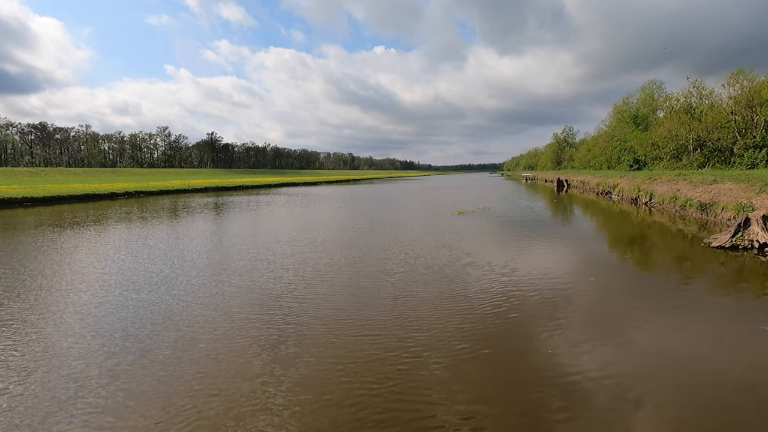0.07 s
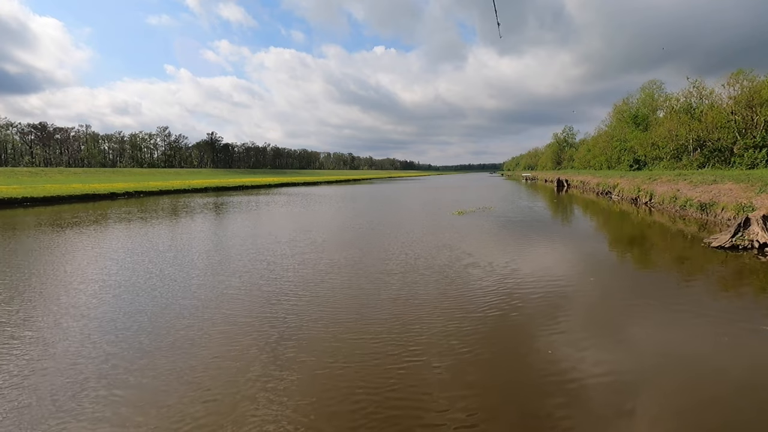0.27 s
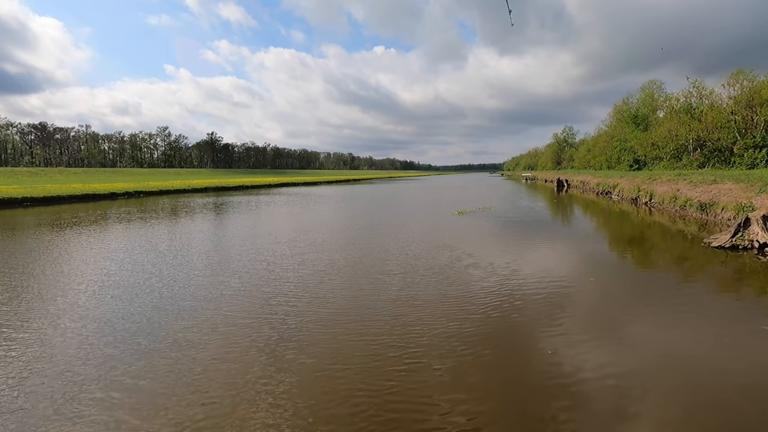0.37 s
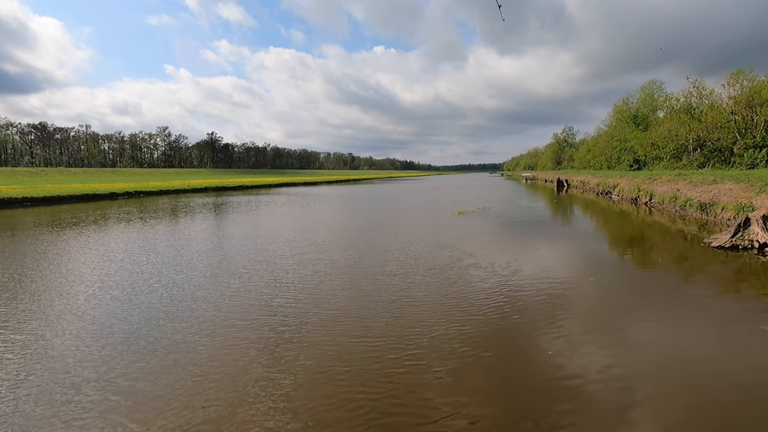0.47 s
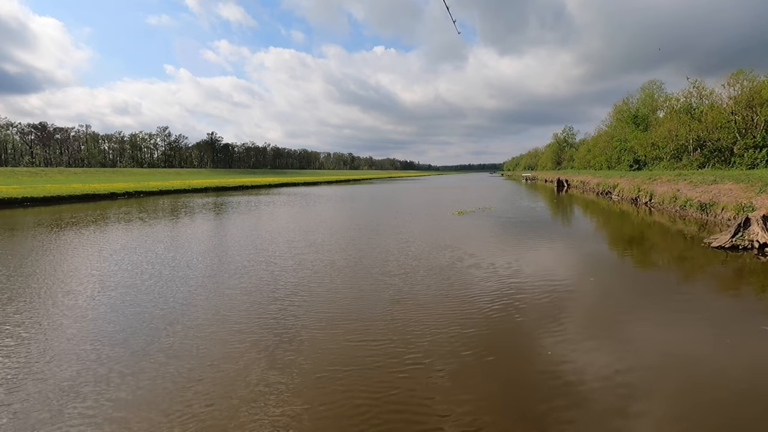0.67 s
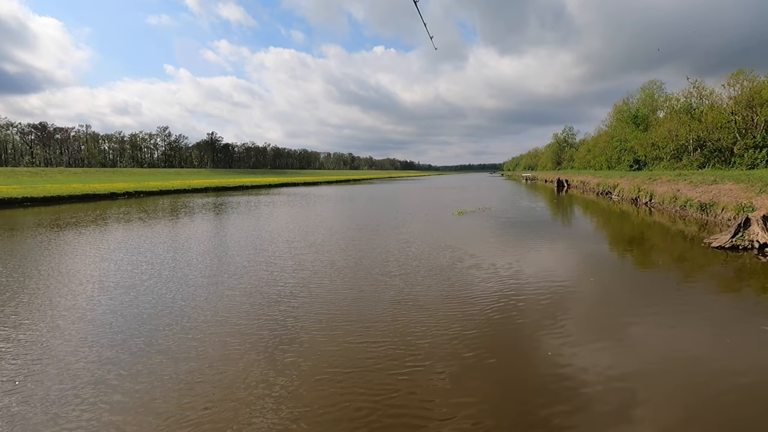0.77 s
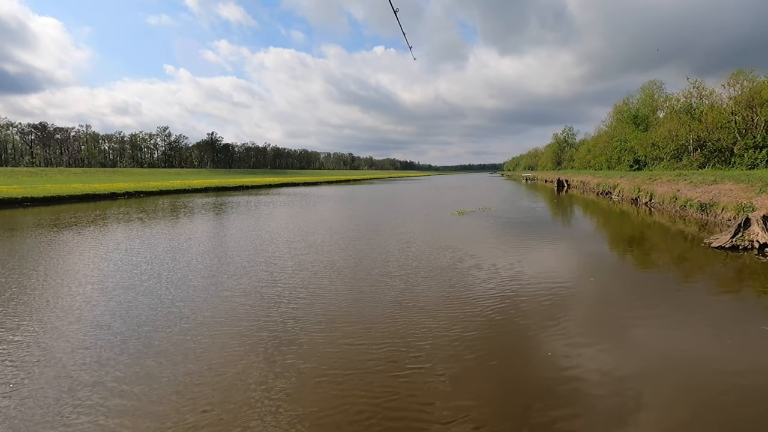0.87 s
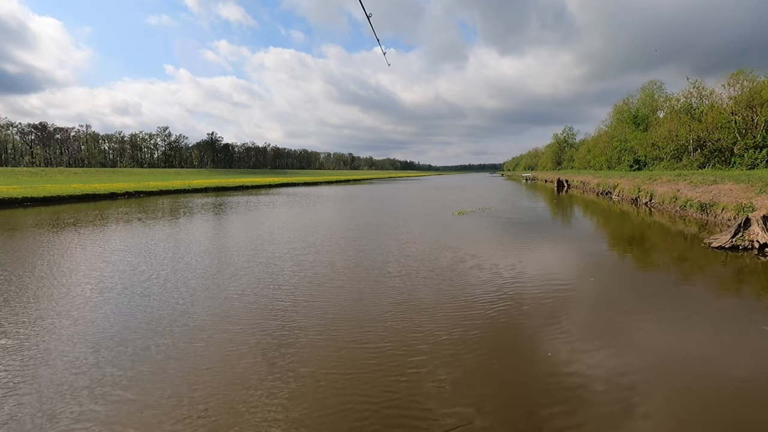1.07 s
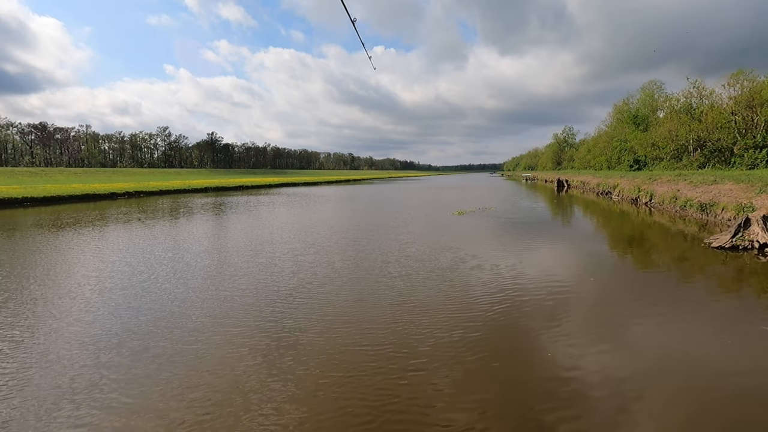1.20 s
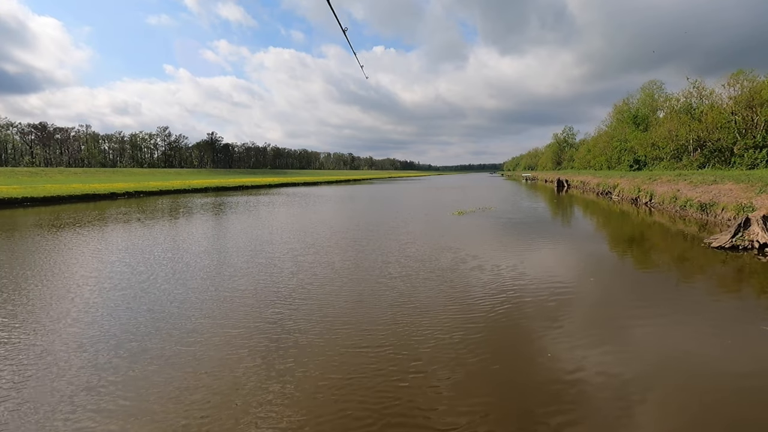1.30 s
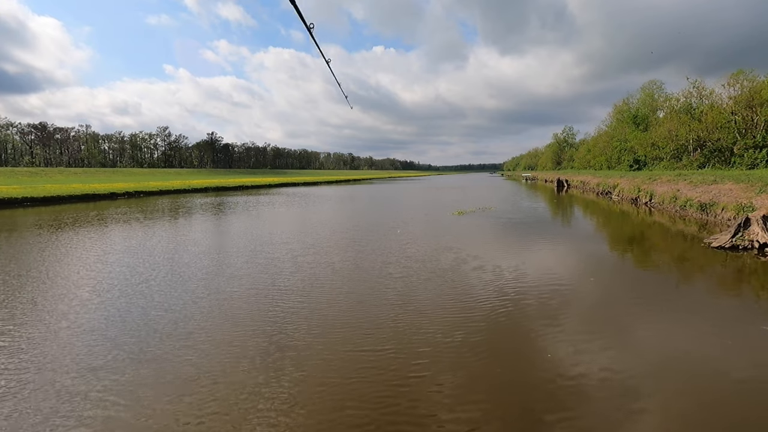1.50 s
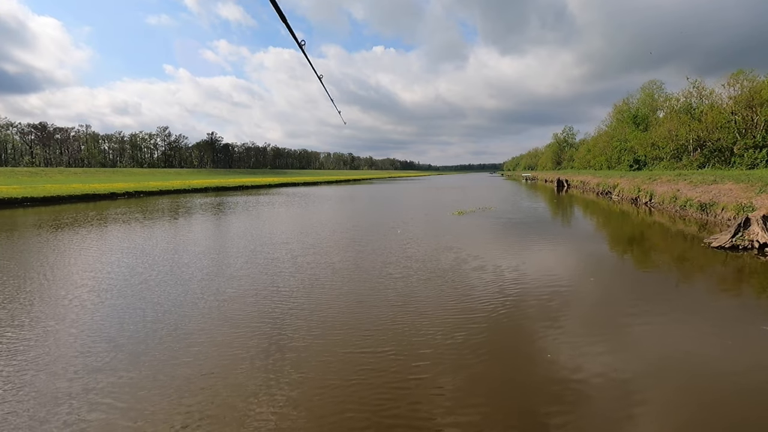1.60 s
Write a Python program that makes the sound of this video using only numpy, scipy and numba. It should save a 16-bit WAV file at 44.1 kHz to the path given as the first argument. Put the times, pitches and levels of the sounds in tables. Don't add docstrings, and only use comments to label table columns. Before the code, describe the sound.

Close stereo outdoor sound of a spinning rod cast: brief whoosh, loud metallic clicks, line whirring out ever slower, soft recoil thump, small water bubbles, faint bird whistles, gentle wind rumble and leaf rustle, almost no echo.

```python
import sys
import numpy as np
from scipy import signal
from scipy.io import wavfile
from scipy.ndimage import uniform_filter1d, map_coordinates
from numba import njit

SR = 44100
rng = np.random.default_rng(int(sys.argv[2]) if len(sys.argv) > 2 else 0)


def convert_level_to_amplitude(level_db):
    exponent = np.asarray(level_db, float) / 20
    return 10 ** exponent


def store_pcm(level_fs):
    pcm = np.round(np.clip(level_fs, -1, 1) * 32767).astype(np.int16)
    wavfile.write(sys.argv[1], SR, np.atleast_2d(pcm).T)


N = 72765

# frequency in Hz, level in dB per Hz.
AIR_TONE = [(100, -0.5), (300, -14.5), (800, -16.5), (1500, -14), (3200, -31), (5000, -23), (7000, -26.5),
            (12500, -41)]
# time in seconds, level in dB.
AIR_LULLS = [(0, 1.5), (.09, -1), (1.0, 0), (1.39, 0), (1.415, -5), (1.455, -5), (1.48, -2), (1.6, -2),
             (1.62, -5)]
# time in seconds, level in dB.
WIND_GUSTS = [(0, -44.5), (.15, -40.5), (.35, -49.5), (.49, -48), (.8, -50), (1.15, -57.5), (1.3, -58.5),
              (1.65, -53)]
# start in seconds, length in seconds, start pitch in Hz, end pitch in Hz,
# level in dB.
BIRD_WHISTLES = [
    (0.945, 0.07, 1850, 2620, -57),
    (1.095, 0.065, 2840, 3110, -57.5),
    (1.157, 0.023, 3320, 3580, -61),
    (1.53, 0.035, 2250, 1880, -57),
    (1.563, 0.05, 1880, 2600, -57),
]
# start in seconds, pitch in Hz, peak level in dB, length in cycles.
BANK_PLOPS = [(.47, 640, -44, 9), (.61, 900, -48, 12), (1.122, 550, -49, 11), (1.145, 530, -49, 14),
              (1.165, 2100, -53, 14), (1.19, 2550, -48, 22), (1.193, 1050, -47, 14), (1.212, 1930, -48, 12),
              (1.226, 690, -46, 11), (1.241, 947, -42, 12), (1.243, 2050, -52, 14), (1.256, 980, -47, 16),
              (1.279, 1530, -44, 16), (1.3, 950, -52, 9), (1.315, 1150, -50, 14), (1.343, 570, -49, 8),
              (1.36, 2050, -51, 14), (1.372, 2100, -52, 16), (1.37, 680, -50, 14), (1.39, 530, -47, 12),
              (1.428, 590, -47, 9), (1.488, 2050, -49, 9), (1.511, 2750, -41, 12), (1.583, 2200, -42, 10),
              (1.509, 1150, -50, 7)]
# time in seconds, shedding pitch in Hz, level in dB.
ROD_SWING = [(.09, 297, -64), (.125, 400, -53), (.145, 505, -40), (.172, 615, -37.5), (.19, 728, -40.5),
             (.21, 900, -38), (.245, 954, -42), (.27, 1015, -47.5), (.33, 1041, -67.5)]
# time in seconds, centre in Hz, level in dB.
SWING_HISS = [(.07, 2800, -60.5), (.11, 3980, -47.5), (.14, 4810, -45), (.18, 4400, -34), (.21, 4970, -46),
              (.25, 5600, -64.5)]
# start in seconds, rise in seconds, hold in seconds, release in seconds,
# level in dB.
BLANK_FLEXES = [
    (.13, 0.025, .025, 0.018, -33.5),
    (.215, .015, .015, .015, -43),
    (0.603, 0.007, 0.004, 0.013, -36),
    (.66, .01, .015, .015, -48),
]
# start in seconds, peak level in dB, brightest pitch in Hz,
# burst in ms, crack level in dB.
RIG_CLICKS = [(.073, -49, 2150, 12.0, -18), (.1745, -23, 3750, 8.0, -20), (.1923, -12, 3300, 7.5, -2),
              (.2098, -16, 4750, 4.0, -15), (.2140, -12.5, 3600, 4.5, -3), (.2205, -18, 4750, 4.0, -9),
              (.2258, -18.5, 4750, 4.0, -9), (.2325, -16, 4000, 1.5, -2), (.2385, -19, 4500, 3.5, -7),
              (.2545, -20, 3700, 5.0, -5), (.4807, -30, 5000, 3.0, -6), (.7849, -39, 6300, 4.0, -6),
              (.9206, -41, 6200, 3.0, -6), (1.0558, -42, 6100, 3.0, -6), (1.328, -45, 2300, 2.0, -6),
              (1.605, -44, 4000, 1.5, -2), (.3739, -25, 5000, 1.5, -5), (.4445, -27, 6000, 2.0, -9),
              (.4495, -25, 6000, 2.0, -9), (.454, -24, 6200, 2.0, -3), (.5016, -33, 2850, 8.0, -8),
              (1.036, -40, 3200, 1.2, -5), (1.3247, -41, 6100, 2.5, -2), (1.4664, -44, 6000, 3.0, -3),
              (1.507, -38, 3600, 1.1, -9), (1.5112, -41, 2600, 4.0, -8), (1.5432, -43, 5500, 1.5, -9),
              (1.5816, -38, 3700, 1.5, -9), (1.587, -39, 3500, 2.0, -9), (1.375, -45, 4500, 6.0, -1)]
# pitch in Hz, level in dB.
RIG_MODES = [(1700, 10), (2120, 9.5), (2850, 3.5), (3160, 3), (3770, 4), (4600, 6), (5770, 2), (6500, 7.5),
             (7670, -13), (8500, -26)]
# time in seconds, level in dB, loops per second.
LINE_FLIGHT = [(.185, -49, 171), (.209, -31, 177), (.224, -26, 196), (.27, -28.5, 174), (.33, -33, 165),
               (.365, -38, 148), (.385, -32.5, 140), (.45, -35, 123), (.47, -41.5, 110), (.505, -36, 98),
               (.55, -41, 109.5), (.7, -47.5, 114), (.79, -45.5, 63), (1.2, -55, 43.6),
               (1.385, -53.5, 45.4), (1.425, -62, 39), (1.47, -60, 47), (1.57, -56.5, 60)]
# early pitch in Hz,
# late pitch in Hz, width in Hz, early level in dB, late level in dB.
GUIDE_TONES = [(1050, 960, 190, -15.5, -5), (1900, 1940, 284, 7, -9), (2840, 2730, 280, -10, -5),
               (3670, 3470, 91, 3, 3.5), (4060, 4190, 360, -6, -2.5), (4470, 5123, 210, 4.5, 5.5),
               (5760, 6163, 354, 2.5, 3), (6490, 7330, 215, 0, 4), (7340, 8220, 2200, -2.5, -11),
               (11800, 6200, 6700, -48, -50)]

SIDES = np.array([[1], [-1]])


def level(x, db):
    return x * convert_level_to_amplitude(db) / np.sqrt(np.mean(x ** 2))


@njit
def svf(x, hz, width):
    y, b, l = np.empty(len(x)), 0., 0.
    for i in range(len(x)):
        g, k = np.tan(np.pi * hz[i] / SR), width[i] / hz[i]
        v = (b + g * (x[i] - l)) / (1 + g * (g + k))
        b, l, y[i] = 2 * v - b, l + 2 * g * v, k * v
    return y


def band(x, hz, width):
    return svf(x, np.minimum(hz + np.zeros(N), SR / 2.2), width + np.zeros(N))


def noise():
    return rng.standard_normal(N)


def band_noise(hz, width, width2):
    return band(band(noise(), hz, width), hz, width2)


def walk(rate):
    hold = int(SR / rate)
    steps = np.repeat(rng.standard_normal(N // hold + 1), hold)
    return uniform_filter1d(uniform_filter1d(steps, hold), hold)[:N] * 1.3


def curve(t, table):
    rows = np.array(table).T
    return [np.interp(t, rows[0], r) for r in rows[1:]]


def place(x, pan_db, lag_ms):
    shift = SIDES * lag_ms * SR / 2000
    ports = [map_coordinates(x, [np.arange(N) - s], order=3, mode="nearest") for s in shift]
    return np.array(ports) * convert_level_to_amplitude(SIDES * pan_db / 2)


def open_air(t):
    out, table = 0, np.array(AIR_TONE)
    for hz in 110 * 2 ** np.arange(0, 7.1, .5):
        db = np.interp(np.log(hz), np.log(table[:, 0]), table[:, 1]) + 2.0 * walk(11.83)
        middle = band_noise(hz, hz / 2, hz / 2)
        side = np.clip(hz / 5000, .4, .5) * band_noise(hz, hz / 2, hz / 2) * SIDES
        out = out + convert_level_to_amplitude(db) * (middle + side)
    return level(out, -56) * convert_level_to_amplitude(curve(t, AIR_LULLS)[0])


def wind(t):
    def rumble():
        return level(band_noise(26.2, 1.02 * 26.2, 2 * 26.2), 0)

    gusts = convert_level_to_amplitude(curve(t, WIND_GUSTS)[0] + 2 * walk(19.7))
    return gusts * (rumble() + 0.56 * band(rumble(), 14, 56) * SIDES)


def lapping():
    return level(band(noise(), 176, 70), -59.5) * convert_level_to_amplitude(3.5 * walk(14))


def leaves():
    middle = band_noise(8670, 950, 950)
    side = 0.55 * band_noise(8670, 950, 950) * SIDES
    return level(middle + side, -66.5) * convert_level_to_amplitude(4.3 * walk(26))


def birds(t):
    out = 0
    for start, length, hz0, hz1, db in BIRD_WHISTLES:
        u = np.clip((t - start) / length, 0, 1)
        cycles = length * u * (hz0 + (hz1 - hz0) * u / 2)
        out = out + convert_level_to_amplitude(db + 1 + 2.5 * walk(80)) * np.sin(np.pi * u) ** 0.4 * np.sin(2 * np.pi * cycles)
    return out


def plops(t):
    glide = .15
    out, chance = 0, rng.random((14, 3))
    faint = [(1.12 + .34 * a, 500 * 4 ** b, -58 + 5 * c, 9) for a, b, c in chance]
    for start, hz, db, cycles in [*BANK_PLOPS, *faint]:
        u = np.clip((t - start) * hz / cycles, 0, 1)
        tone = np.sin(2 * np.pi * cycles * u * (1 + glide * u / 2))
        out = out + convert_level_to_amplitude(db) * np.sin(np.pi * u ** .6) ** 2 * tone
    return out * convert_level_to_amplitude(2 * walk(300))


def recoil(t):
    start_s, length_s, hz = .598, .075, 2300
    shape = np.sin(np.pi * np.clip((t - start_s) / length_s, 0, 1) ** .6)
    return shape * level(band_noise(hz, 2 * hz, 2 * hz), -45) * convert_level_to_amplitude(2.5 * walk(200))


def whirls(t):
    def shed(hz):
        return level(band_noise(hz, 0.17 * hz, 0.34 * hz) / np.sqrt(hz), 0)

    hz, db = curve(t, ROD_SWING)
    octaves = np.log2(hz / 500)
    blank = shed(hz)
    wake = convert_level_to_amplitude(-13 + 11 * octaves) * shed(0.457 * hz)
    tip = convert_level_to_amplitude(-2 + 5 * octaves) * shed(2.3 * hz)
    return (blank + wake + tip) * convert_level_to_amplitude(db + walk(58.5))


def hiss(t):
    hz, db = curve(t, SWING_HISS)
    return level(band_noise(hz, 1.5 * hz, 1.3 * hz), 0) * convert_level_to_amplitude(db + 2.0 * walk(100.5))


def flexes(t):
    out, hz, width_hz = 0, 169, 120
    for start, rise, hold, release, db in BLANK_FLEXES:
        fade = np.exp(-np.maximum(t - start - rise - hold, 0) / release)
        shape = np.clip((t - start) / rise, 0, 1) * fade
        hum = np.sin(2 * np.pi * hz * (t - start)) + level(band(noise(), hz, width_hz), -7)
        out = out + convert_level_to_amplitude(db) * shape * hum
    return out


def clicks(t):
    focus_db_per_oct, ring_t60_s = 12, .06
    out, u = np.zeros(N), t[:2048]
    for start, db, hz, ms, crack_db in RIG_CLICKS:
        i = int(start * SR)
        shape = np.minimum(u / .0003, 1) * np.exp(-(u * 1000 / ms) ** 2) + .12 * np.exp(-u * 300 / ms)
        ring = 0
        for f, gain in [*RIG_MODES, (hz, -crack_db / 2)]:
            strength = convert_level_to_amplitude(gain - focus_db_per_oct * abs(np.log2(f / hz)))
            ring = ring + strength * np.sin(2 * np.pi * f * u + rng.uniform(0, 2 * np.pi))
        edges = [hz / 2, min(hz * 3, 16000)]
        broad = signal.butter(1, edges, "bandpass", fs=SR, output="sos")
        crack = signal.sosfilt(broad, rng.standard_normal(len(u)))
        hit = level(level(ring, 0) + level(crack, crack_db), db - 5)
        hit = hit * shape * np.exp(-np.log(1000) * u / ring_t60_s)
        out[i:i + len(u)] += hit[:N - i]
    return out


def line(t):
    slaps_per_loop, slap_ms, jitter = 2.3, 1.5, .45
    slap_scatter_db, guide_scatter_db = 3.5, 5.0
    rub_db, rub_gain_db_per_s = -3, 3.5
    settle_s, stop_s, stop_fade_s = 0.13, 1.585, 0.03
    db, rate = curve(t, LINE_FLIGHT)
    turns = np.cumsum(rate * slaps_per_loop) / SR
    chance = rng.uniform(-1, 1, (500, 2 + len(GUIDE_TONES)))
    at = np.interp(np.arange(len(chance)) + jitter * chance[:, 0], turns, np.arange(N)).astype(int)
    fall = np.exp(-1000 / (slap_ms * SR))
    grit = noise()
    late = 1 - np.exp(-np.maximum(t - LINE_FLIGHT[1][0], 0) / settle_s)

    def push(k):
        force = convert_level_to_amplitude(slap_scatter_db * chance[:, 1] + guide_scatter_db * chance[:, k])
        hits = np.bincount(at, force, N)
        hits[[0, -1]] = 0
        gate = signal.lfilter([1], [1, -fall ** 3], hits)
        gate = signal.lfilter([1], [1, -fall], gate) / np.sqrt(rate)
        return (level(gate, 0) + convert_level_to_amplitude(rub_db + rub_gain_db_per_s * t)) * grit

    ring = 0
    for k, (hz0, hz1, width, db0, db1) in enumerate(GUIDE_TONES):
        strength = convert_level_to_amplitude(db0 + (db1 - db0) * late + 1.83 * walk(19.08))
        tone = band(push(k + 2), hz0 + (hz1 - hz0) * late, width)
        ring = ring + (-1) ** k * strength * tone
    out = level(ring, 0) + level(band(push(1), 2900, 9200), -11)
    stop = np.clip((stop_s + stop_fade_s - t) / stop_fade_s, 0, 1)
    return out * convert_level_to_amplitude(db) * stop * (t > LINE_FLIGHT[0][0] - .05)


def bank_echo(x, t):
    tail = rng.standard_normal((2, 4096)) * np.exp(-np.log(1000) * t[:4096] / .04)
    tail = tail / np.sqrt(np.sum(tail ** 2) / 2)
    return convert_level_to_amplitude(-10) * signal.fftconvolve(band(x, 1160, 1730)[None], tail, axes=1)[:, :N]


def scene():
    t = np.arange(N) / SR
    fly = line(t)
    tick = clicks(t)
    swish = whirls(t) + hiss(t) + flexes(t)
    out = bank_echo(fly + tick + 2.6 * swish, t)
    out = out + place(fly, pan_db=3.0, lag_ms=0.0085)
    out = out + place(tick, pan_db=-3.0, lag_ms=0.028)
    out = out + place(swish, pan_db=1.5, lag_ms=0.037)
    out = out + place(recoil(t), pan_db=11.0, lag_ms=-0.014)
    out = out + place(plops(t), pan_db=-0.5, lag_ms=0.11)
    out = out + place(birds(t), pan_db=5.0, lag_ms=-0.044)
    return out + open_air(t) + wind(t) + lapping() + leaves()


def roll_off(x):
    return signal.sosfilt(signal.butter(12, 16480, fs=SR, output="sos"), x)


def record(dry):
    dull = signal.sosfilt(signal.ellip(6, .5, 40, 12800, fs=SR, output="sos"), dry)
    mix = dull + convert_level_to_amplitude(-17) * (dry - dull)
    return roll_off(mix)


dry = scene()
out = record(dry)
store_pcm(out)
```